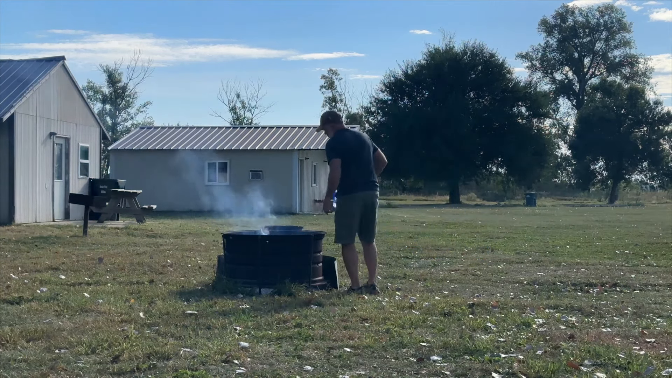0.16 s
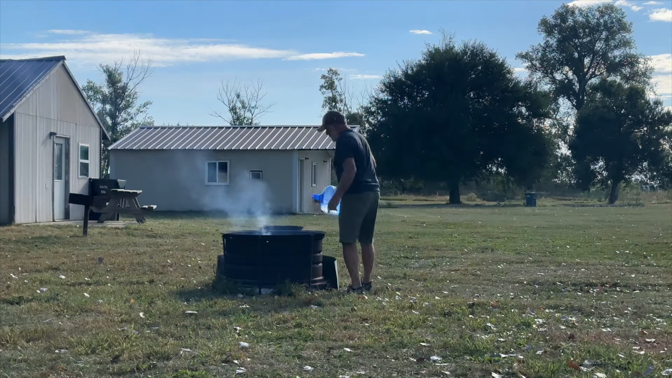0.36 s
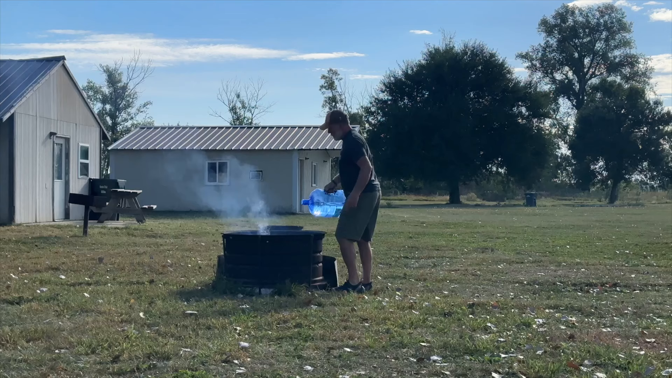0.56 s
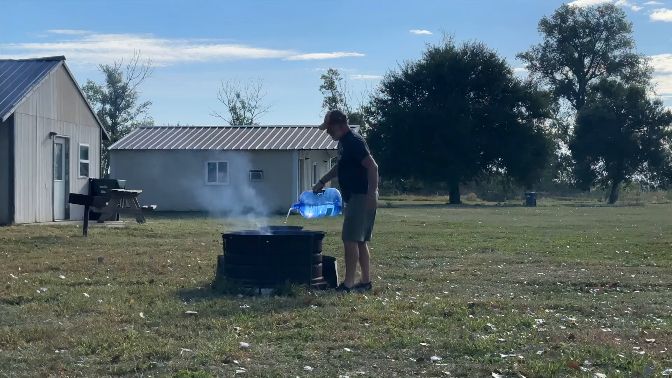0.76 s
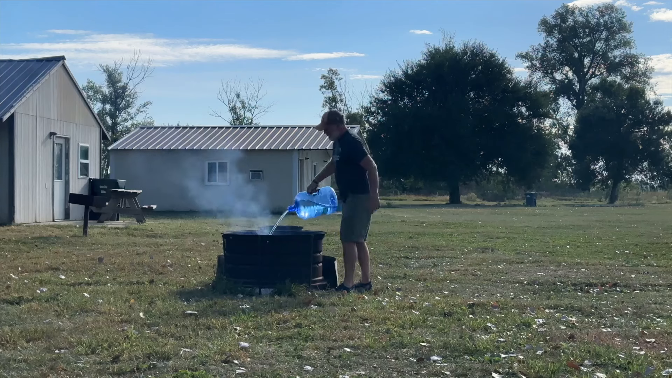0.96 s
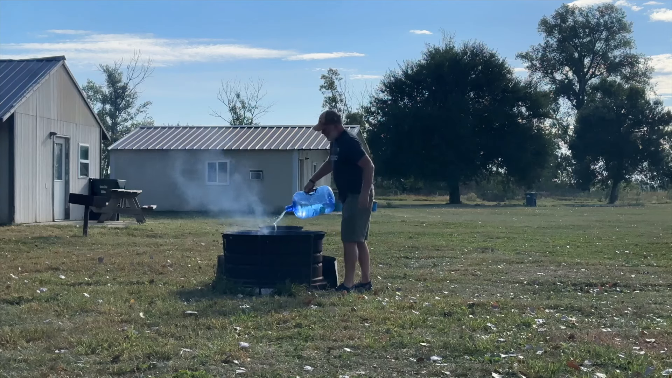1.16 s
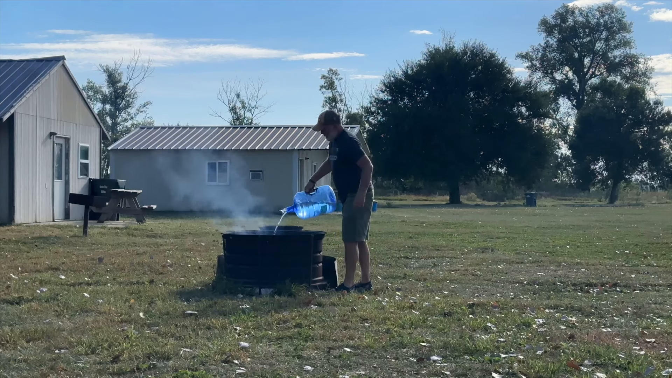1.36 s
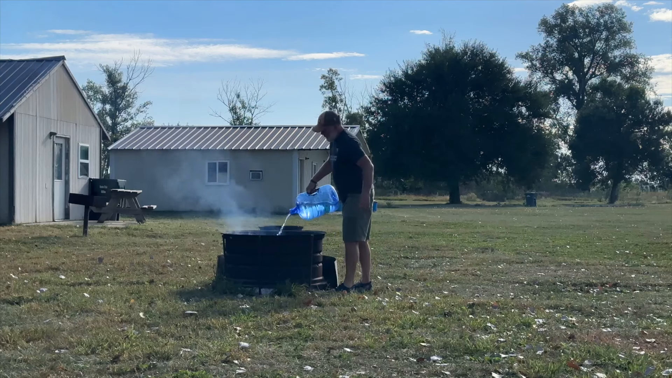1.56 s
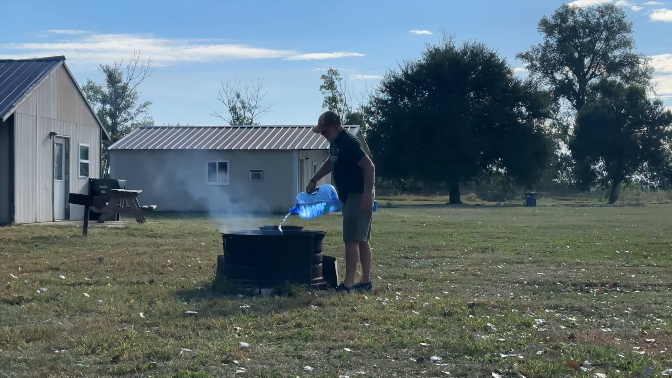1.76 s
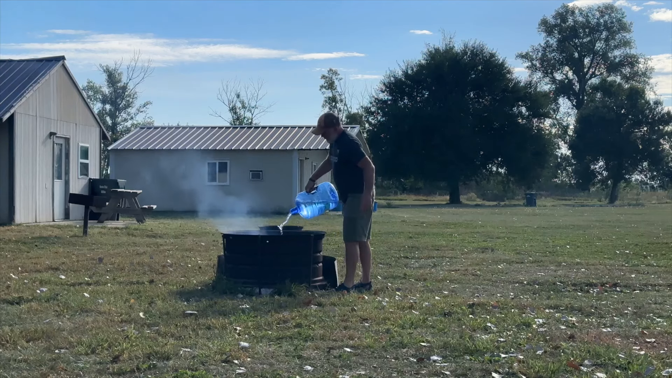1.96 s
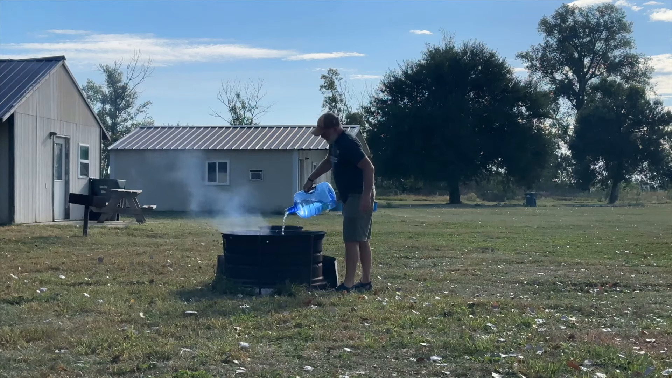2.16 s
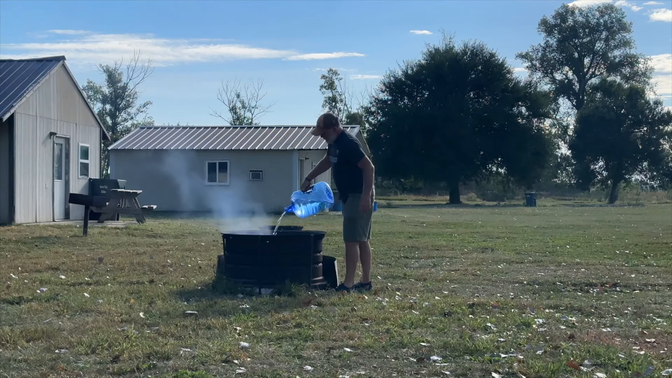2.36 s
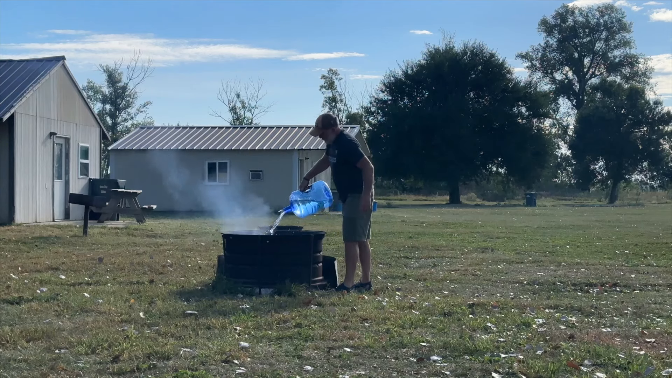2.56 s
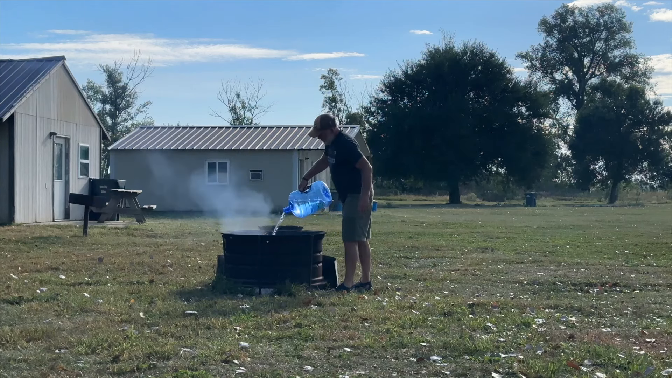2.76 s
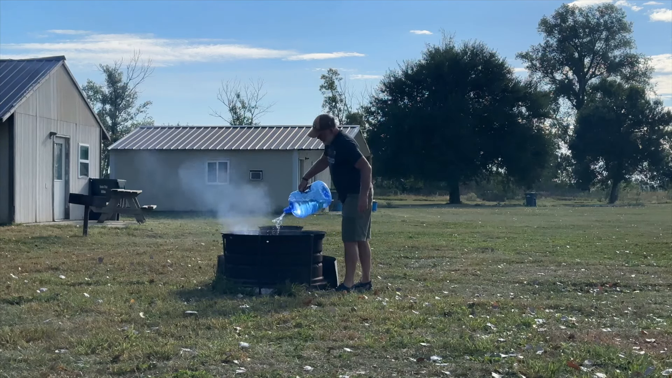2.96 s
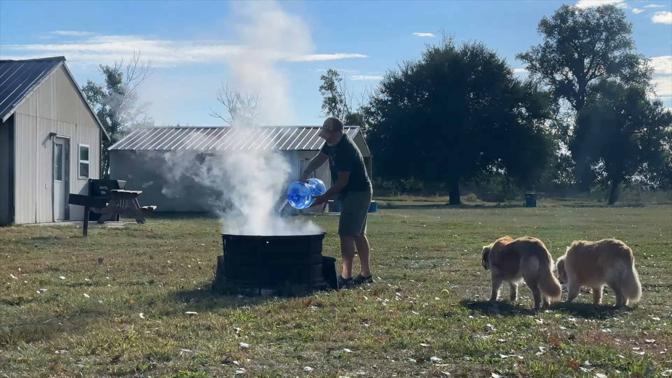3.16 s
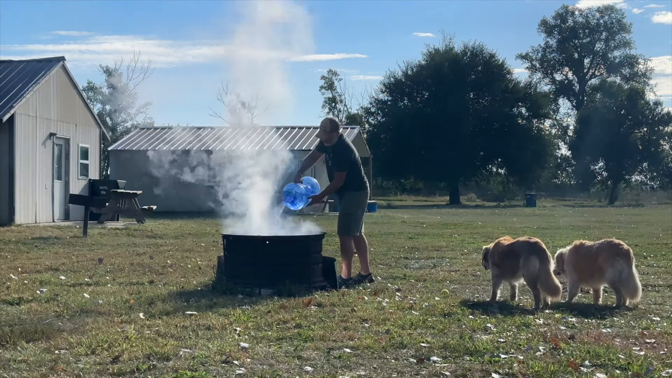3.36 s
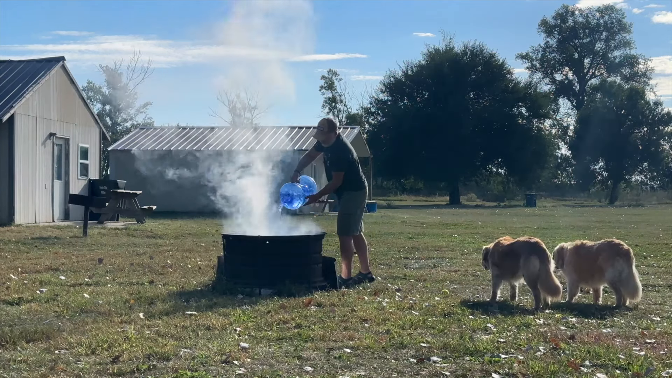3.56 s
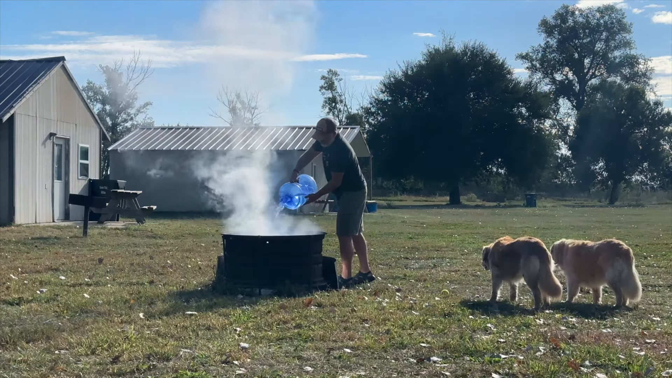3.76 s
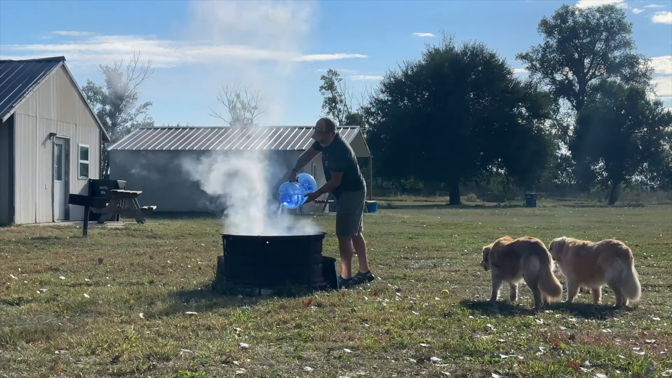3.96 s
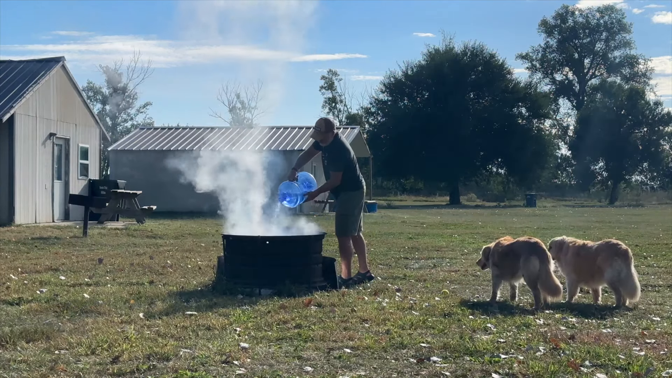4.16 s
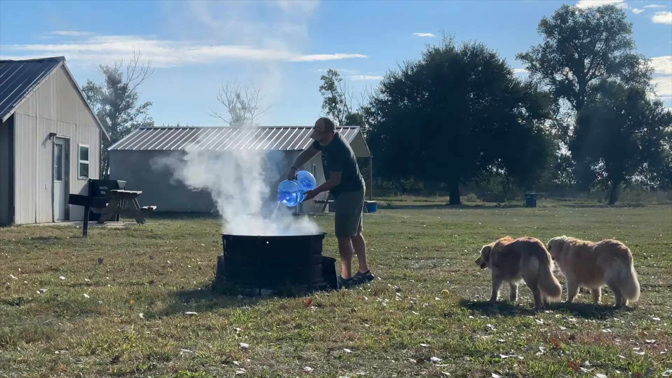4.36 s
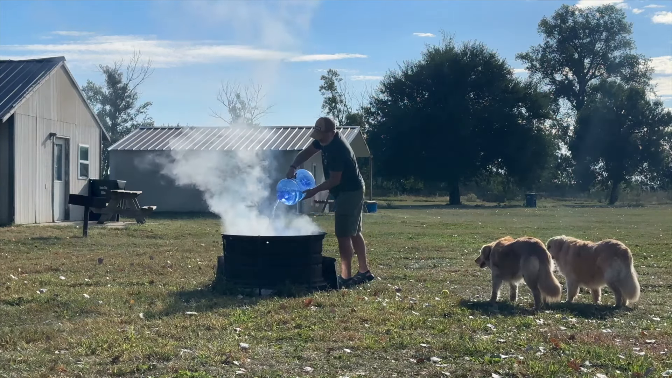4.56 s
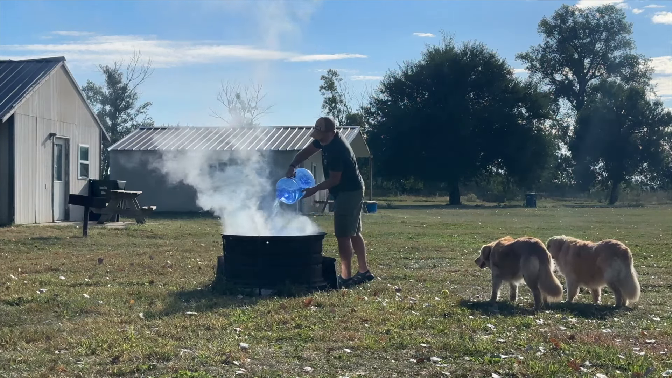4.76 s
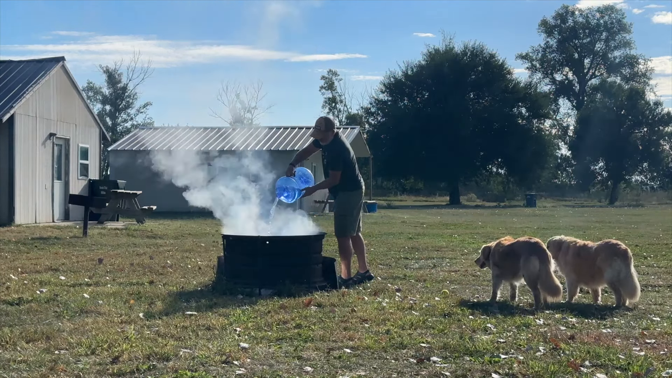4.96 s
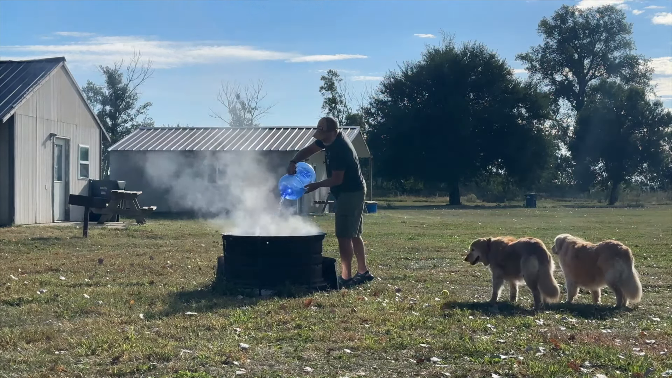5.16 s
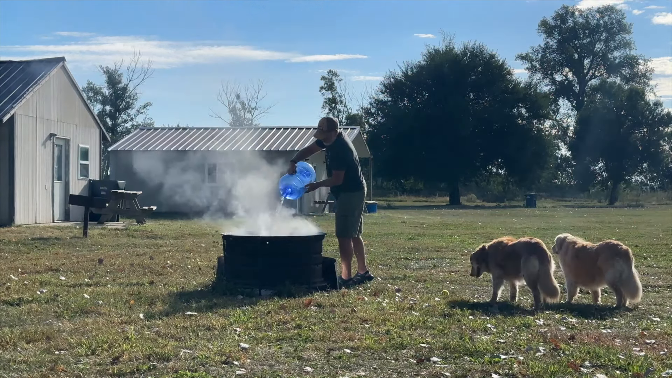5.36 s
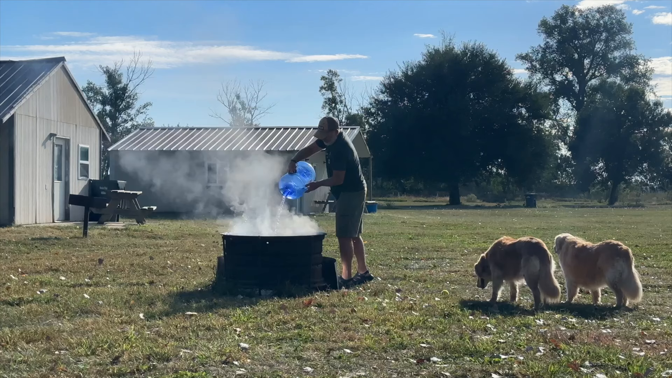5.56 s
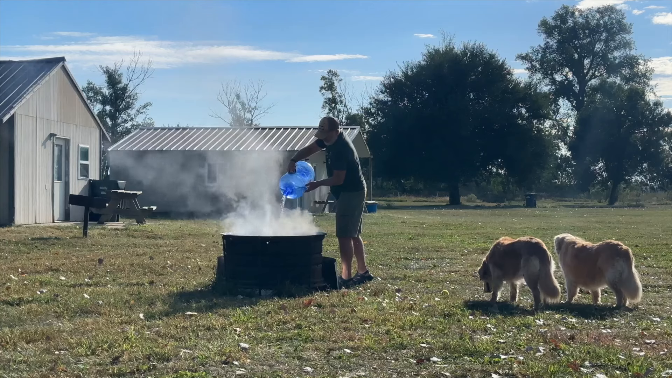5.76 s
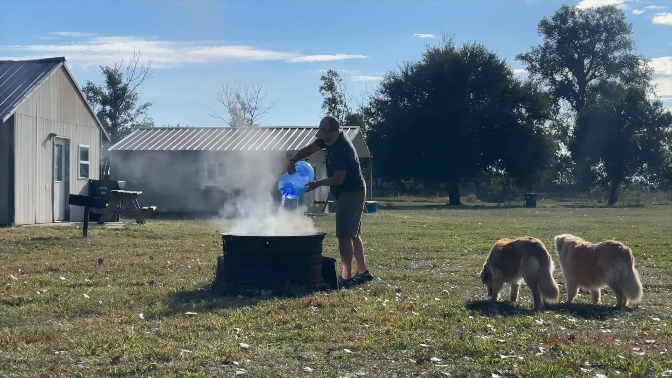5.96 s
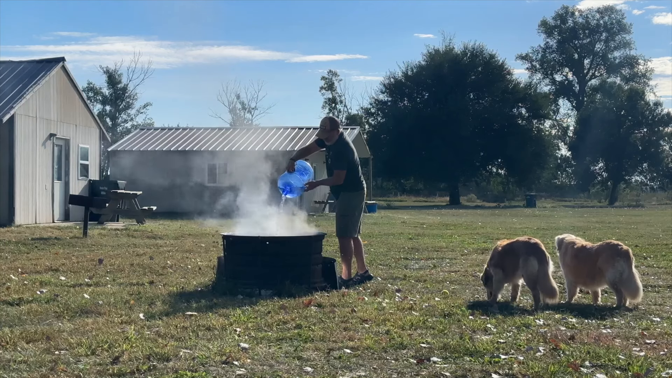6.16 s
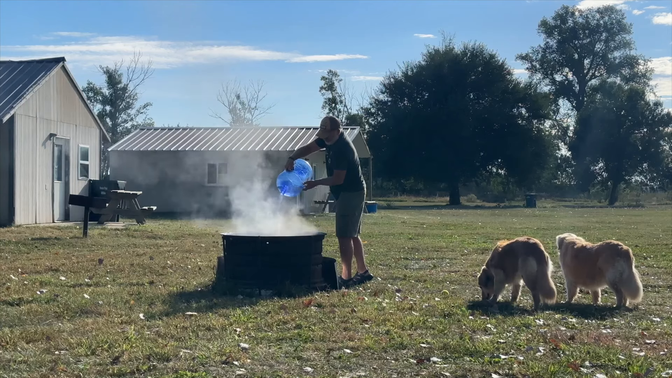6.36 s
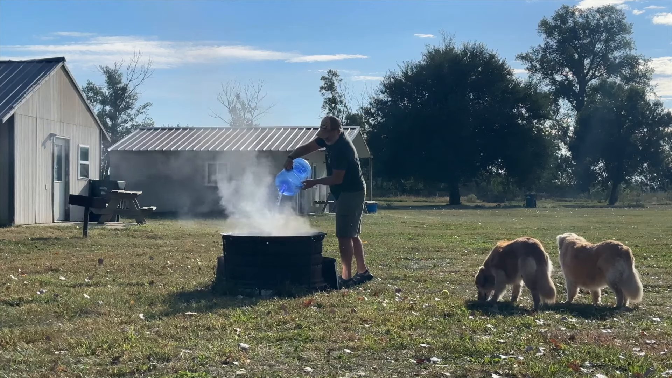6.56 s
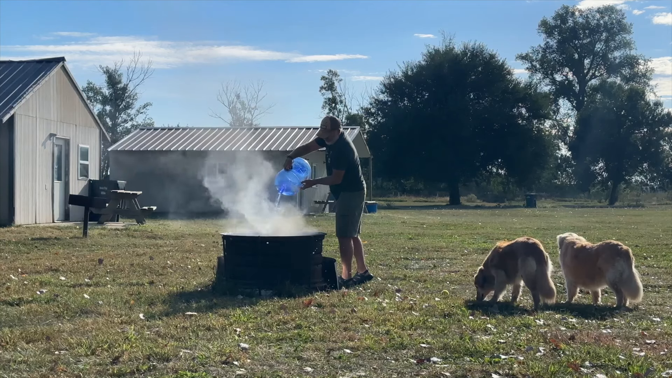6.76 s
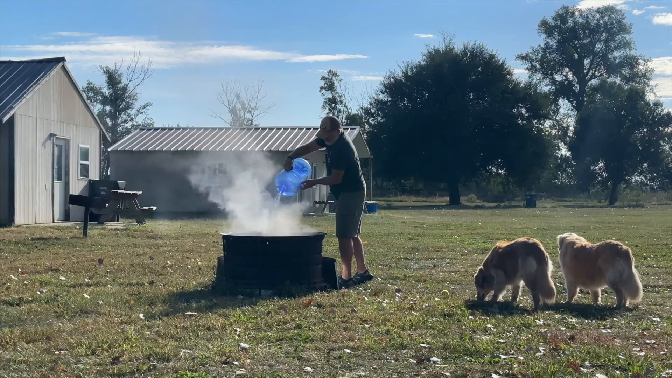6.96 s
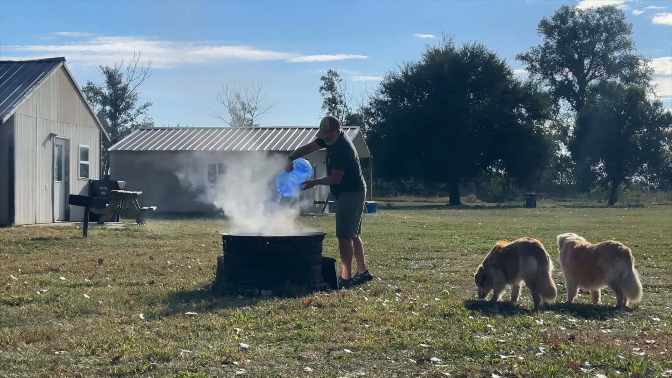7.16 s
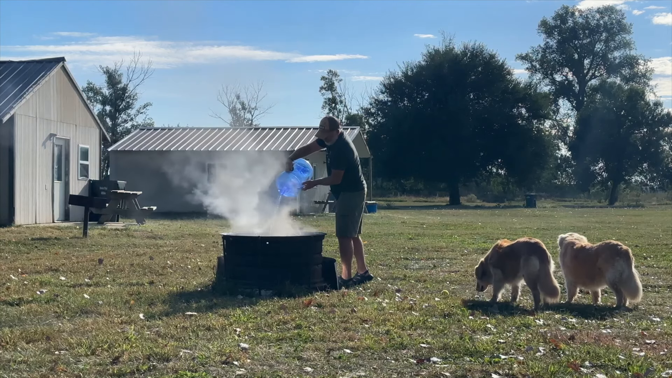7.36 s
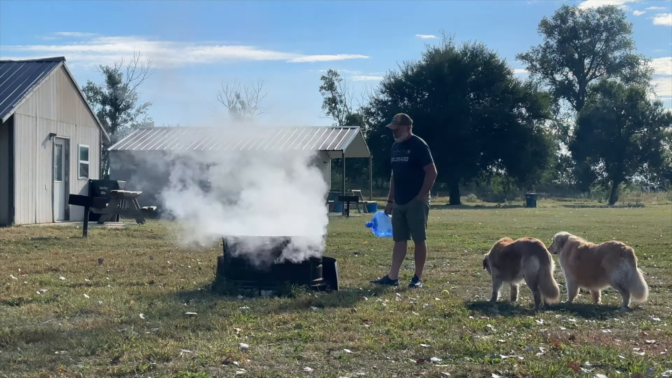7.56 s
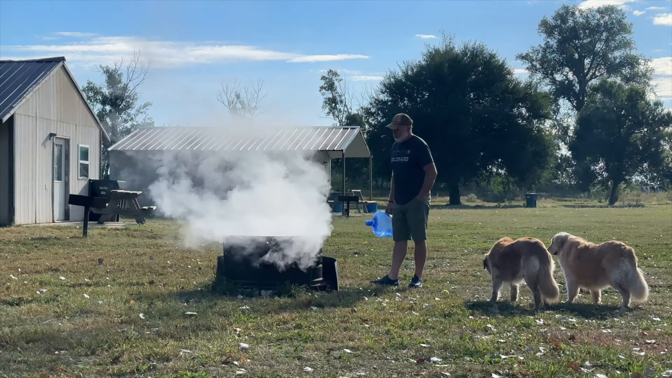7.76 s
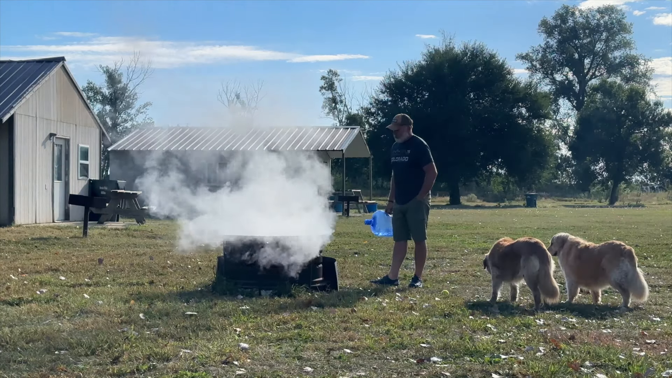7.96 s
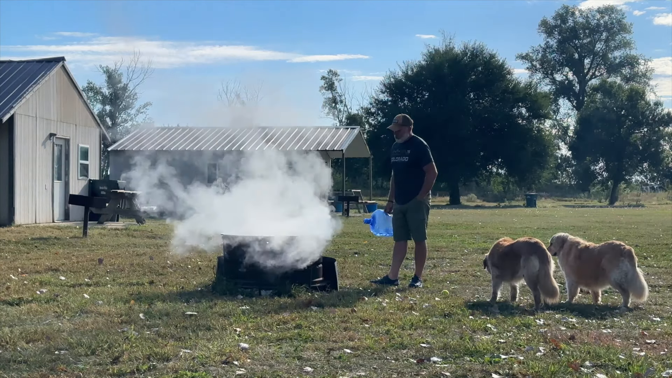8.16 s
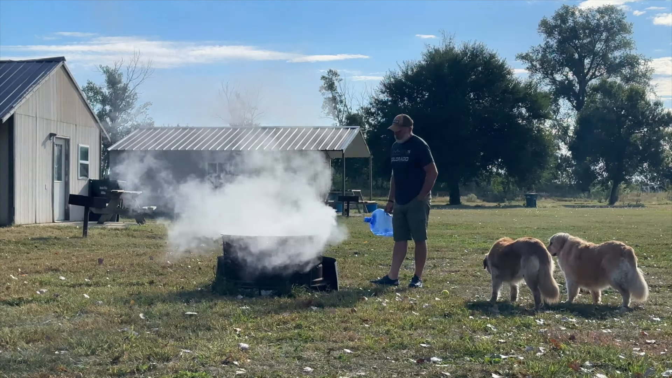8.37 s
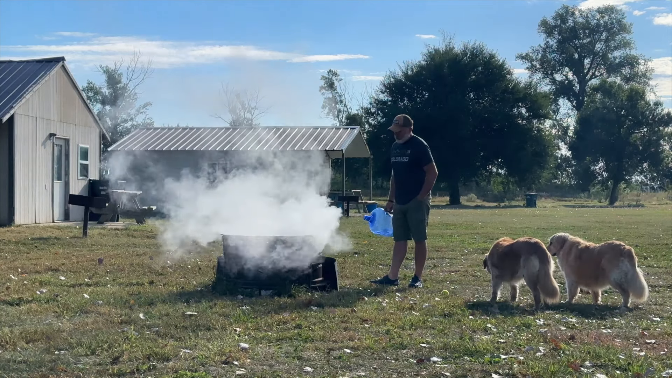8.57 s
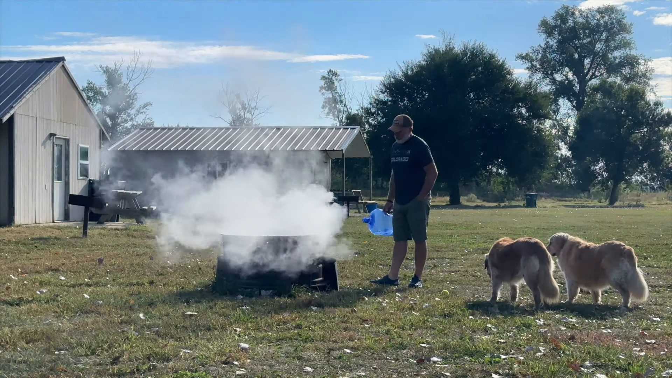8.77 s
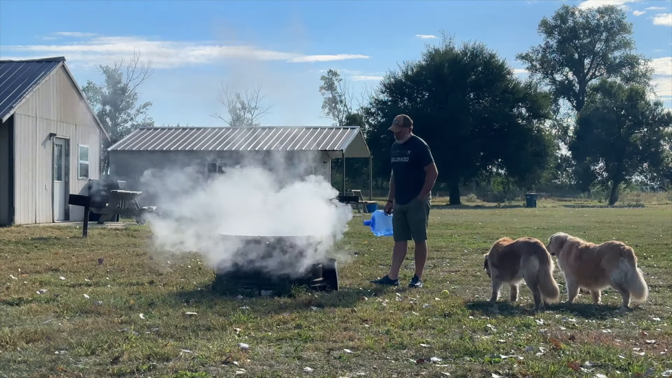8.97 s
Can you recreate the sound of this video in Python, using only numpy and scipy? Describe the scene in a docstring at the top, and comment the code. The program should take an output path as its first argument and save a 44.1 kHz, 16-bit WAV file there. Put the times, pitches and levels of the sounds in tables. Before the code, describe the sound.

Water glugs from a plastic jug onto hot coals in a steel fire ring, sizzling, plopping and cracking, with crickets and low wind rumble.

```python
"""Water is poured from a plastic jug onto hot coals in a steel fire ring, some metres off on a lawn.
Slaps, plops and gurgles are noise bursts and ringing bubbles; the stream is a mass of tiny bubbles.
The coals sizzle (crackle in hiss), spit, crack and whoomph; steam is a soft low roar of noise.
Crickets (falling tones, merged trills) and katydids (pulsed high rasps) sing in the grass.
Wind, as low noise, rumbles on the microphone."""
import sys
import numpy as np
from scipy import signal
from scipy.fft import rfft, irfft, next_fast_len
from scipy.io import wavfile

SR = 44100
rng = np.random.default_rng(int(sys.argv[2]) if len(sys.argv) > 2 else 0)


def unload_audio(sound):
    """Save the sound as a 16-bit wav file, at the path given as the first command line argument."""
    columns = np.transpose(np.atleast_2d(sound))
    # keep every value between -1 and 1, then stretch to whole-number steps
    steps = np.round(np.clip(columns, -1, 1) * 32767)
    wavfile.write(sys.argv[1], SR, steps.astype(np.int16))


N = 397782

# All levels are relative: they precede the mix gains in scene().
# breeze: (time [s], rumble level [dB], buffeting level [dB])
WIND = [(0, -35, -40), (0.9, -39, -43), (1.5, -37.5, -41.5), (2.2, -38, -43), (3.2, -39.5, -45.5),
        (3.7, -38, -46.5), (4.75, -38, -42), (5.0, -36, -41), (5.3, -37.5, -43), (7.3, -38, -43),
        (8.6, -41, -47), (9.02, -43, -49.5)]
# low whoomphs near 100 Hz, mostly as water surges onto the coals: (time [s], length [s], level [dB])
WHOOMPHS = [(1.3, 0.12, -39), (1.6, 0.05, -34.5), (4.03, 0.084, -37.5), (4.255, 0.042, -29),
            (4.66, 0.083, -35), (7.44, 0.046, -43)]
# field cricket chirps of three wing strokes: (time [s], level [dB], starting pitch [Hz], first gap [s],
# second gap [s], stroke length [s], swell per stroke [dB], pitch step per stroke [Hz])
CHIRPS = [(0.1, -49, 4330, 0.055, 0.07, 0.031, 1, 2), (0.675, -49, 4340, 0.052, 0.069, 0.031, 2, 0),
          (1.253, -45, 4340, 0.048, 0.066, 0.035, 1, 0), (3.069, -48, 4280, 0.059, 0.067, 0.031, 1.5, -2),
          (3.681, -46, 4330, 0.059, 0.07, 0.023, 0.5, -3),
          (7.702, -45.5, 4330, 0.058, 0.063, 0.032, 0.5, 6), (7.742, -50, 4970, 0.025, 0.03, 0.02, 0, 0),
          (8.123, -47, 4420, 0.073, 0.13, 0.017, -1, -3),
          (8.253, -48.5, 5000, 0.074, 0.09, 0.022, 4.5, -230),
          (8.294, -40, 4430, 0.07, 0.079, 0.027, 3.5, 111), (8.67, -48, 5100, 0.06, 0.07, 0.02, -1.5, 150),
          (8.943, -42, 4720, 0.036, 0.06, 0.024, -1, 2)]
# katydid songs: (time [s], length [s], level [dB])
SLOW_SONGS = [(0.3, 1, -59), (3.0, 1.2, -58), (4.9, 1.3, -57.5)]
FAST_SONGS = [(1.5, 1.53, -53), (3.9, 1.1, -56.5), (6.3, 2.7, -54)]
# steam over wet coals: (time [s], roar level [dB])
STEAM = [(0, -61), (0.8, -56), (1.3, -55.5), (2.0, -49.5), (2.95, -50.5), (3.15, -56), (4.85, -59.5),
         (5.15, -50), (6.1, -48), (7.45, -46), (7.8, -54.5), (9.02, -55)]
# short steam puffs around the gulps: (time [s], length [s], roar level [dB])
PUFFS = [(1.33, 0.15, -49.5), (1.59, 0.06, -46.5), (1.89, 0.11, -51), (2.1, 0.08, -49.5), (2.35, 0.17, -48),
         (4.66, 0.11, -49), (6.04, 0.047, -43)]
# quenched coals crack: (time [s], level [dB], pitch [Hz])
CRACKS = [(1.8763, -23.5, 3770), (2.029, -27, 3730), (2.4003, -25.5, 3800), (2.5225, -28, 3860),
          (2.7087, -25, 8000), (3.233, -35.5, 3750), (3.445, -27, 6600), (3.6966, -22, 7270),
          (4.072, -25, 4700), (4.543, -25, 4700), (4.5697, -19.5, 3670), (4.624, -28, 3650),
          (4.6587, -20.5, 7200), (5.0258, -10.5, 7010), (5.0255, -26, 3660), (5.2875, -28, 7000),
          (6.087, -21.5, 8500)]
# spits, water slapping onto coals and flashing off: (time [s], level [dB], pitch [Hz], decay [s])
SPITS = [(0.089, -40, 2100, 0.0038), (0.499, -38, 3560, 0.015), (0.976, -43, 990, 0.012),
         (1.321, -35.5, 2900, 0.015), (1.875, -42, 940, 0.02), (2.109, -38, 2500, 0.004),
         (2.399, -28.5, 1900, 0.0038), (2.841, -32.5, 2420, 0.009), (2.979, -35, 2280, 0.0039),
         (3.231, -42, 3000, 0.0033), (3.697, -33, 1900, 0.0074), (4.072, -33, 1600, 0.0046),
         (4.255, -27.5, 2400, 0.0036), (4.628, -29.5, 1800, 0.0053), (4.658, -29, 5500, 0.0046),
         (4.686, -40, 1200, 0.022), (5.016, -31.5, 2260, 0.016), (6.255, -42, 1310, 0.034),
         (6.479, -33.5, 3020, 0.019), (7.456, -32, 3160, 0.013)]
# the stream, poured in several stretches with pauses: (time [s], sizzle level [dB], splashing level [dB])
POUR = [(0, -53, -60), (0.47, -74.5, -57), (0.52, -54.5, -50.5), (0.9, -69, -59), (1.08, -52.5, -49.5),
        (2.3, -51.5, -47.5), (3.01, -52, -47), (3.06, -69, -59), (3.35, -66, -63), (3.4, -52, -48.5),
        (4.0, -56, -50.5), (4.45, -49.5, -53), (4.85, -52, -48.5), (5.15, -48, -47.5), (5.8, -47, -49),
        (6.1, -49.5, -48), (7.38, -51.5, -48), (7.55, -48, -48), (7.59, -60.5, -63), (9.02, -61.5, -62)]
# surges as the jug glugs: (time [s], length [s], sizzle level [dB], splashing level [dB])
SURGES = [(1.06, 0.044, -68, -49), (2.39, 0.098, -54, -53), (2.8, 0.041, -46.5, -59),
          (2.92, 0.016, -54, -50), (3.975, 0.031, -44, -52), (4.015, 0.069, -44, -41.5),
          (4.095, 0.018, -43.5, -45), (4.32, 0.052, -47, -54), (4.68, 0.11, -49, -44.5),
          (4.91, 0.036, -44, -40.5), (5.15, 0.028, -47, -40.5), (5.18, 0.018, -48, -46),
          (5.212, 0.049, -57, -42.5), (5.395, 0.012, -49, -52), (5.472, 0.018, -58, -37),
          (5.545, 0.016, -61, -44), (5.615, 0.029, -50, -48), (5.69, 0.067, -47, -44),
          (6.055, 0.047, -49.5, -37), (6.155, 0.022, -49, -37), (6.28, 0.13, -62, -43),
          (6.8, 0.49, -57, -47)]
# gurgles in a deepening water-filled hollow: (time [s], level [dB], starting pitch [Hz], length [s])
GURGLES = [(0.522, -46, 1750, 0.12), (0.622, -42, 980, 0.09), (1.045, -45, 746, 0.028),
           (1.31, -43, 603, 0.05), (1.885, -38, 473, 0.06), (1.985, -37.5, 966, 0.04),
           (2.718, -38, 780, 0.04), (2.972, -41, 600, 0.038), (3.545, -43, 810, 0.016),
           (3.59, -38, 1340, 0.028), (3.735, -36.5, 1115, 0.053), (3.88, -39.5, 865, 0.017),
           (4.061, -45, 730, 0.056), (4.525, -44, 990, 0.04), (4.645, -37.5, 1490, 0.029),
           (4.596, -37.5, 1160, 0.032), (4.681, -28.5, 1600, 0.025), (4.696, -37, 975, 0.035),
           (4.71, -44, 1460, 0.06), (5.576, -41, 910, 0.022), (5.7, -36.5, 1300, 0.04),
           (6.051, -37, 2160, 0.068), (6.261, -31, 1760, 0.08), (6.985, -35, 843, 0.064)]
# gulps of water landing: (time [s], level [dB], bubble pitch [Hz], droplets re bubble [dB])
PLOPS = [(0.985, -34, 2470, -11), (0.999, -36, 1190, -18), (1.301, -21, 1160, -12), (1.319, -29, 1286, -2),
         (1.36, -28.5, 1230, -15), (1.5935, -24.5, 1900, -14), (1.597, -27, 1256, -18),
         (1.878, -22, 3420, -6), (1.902, -25, 2420, -6), (2.0285, -23, 2490, -20),
         (2.032, -18.5, 2350, -20), (2.0965, -23, 1250, -13), (2.107, -31, 1300, -9),
         (2.367, -30, 1300, -6), (2.387, -24, 1260, -9), (2.4, -24.5, 2030, -6), (2.413, -22, 1670, -16),
         (2.515, -22, 1290, -11), (2.588, -36.5, 1410, 2), (2.832, -22, 1070, -14),
         (2.846, -28.5, 1220, -14), (3.232, -30, 1780, -13), (3.444, -26.5, 1280, -13),
         (3.9915, -17, 1920, -18), (4.022, -35, 1610, -10), (4.04, -29, 835, -22), (4.06, -27, 1890, -15),
         (4.151, -23, 2970, -9), (4.227, -33.5, 1390, -19), (4.265, -29.5, 1075, -17),
         (4.294, -29, 2300, -16), (4.514, -26, 2130, -9), (4.524, -24.5, 1760, -8), (4.568, -27, 1410, -26),
         (4.577, -23, 1620, -18), (4.589, -21, 1850, -21), (4.62, -27, 1980, -18), (4.629, -27, 1620, -6),
         (5.072, -35.5, 1350, -12), (5.217, -28, 2230, 5), (5.37, -29.5, 1430, -19),
         (5.406, -28, 1380, -15), (5.489, -26, 2420, -8), (5.652, -24, 2530, -10), (6.065, -33, 1534, -6),
         (6.16, -33, 2040, -2), (6.364, -28, 1740, -11)]
# heavy gulps thudding into the ash bed: (time [s], level [dB], starting pitch [Hz])
THUDS = [(1.302, -19.5, 560), (1.876, -24, 526), (1.8757, -21, 980), (2.097, -30.5, 704), (2.979, -38, 487),
         (4.629, -24, 800), (4.636, -35, 476), (4.696, -28.5, 590), (5.012, -36, 670)]

# filter curves of the sources: (frequency [Hz], gain [dB])
RUMBLE_CURVE = [(12, -40), (25, -17), (42, -7.5), (54, 5), (62, 9), (72, 4), (85, 5), (105, -16),
                (200, -78.5)]
LOW_THUMP_CURVE = [(60, -38), (90, -4), (108, 3), (140, -7.5), (180, -13.5), (350, -90)]  # wind buffeting and whoomphs
LAWN_CURVE = [(100, 13), (500, 4.5), (800, 1.5), (1300, -11.5), (1600, -7), (1850, 7), (2200, -32),
              (2700, 3), (3500, -1), (5500, -0.5), (9500, -24), (12500, -10), (16000, -25)]
CHORUS_CURVE = [(3500, -36.5), (4000, -4), (4300, 0.5), (4700, -6), (5400, -32), (6200, -2.5), (6600, 0),
                (7000, 7), (7500, 4), (8050, 0), (8600, -21.5), (10500, -29)]
KATYDID_CURVE = [(10000, -32.5), (12000, -16), (13000, -9.5), (13600, -7.5), (14400, -12.5), (15000, -3),
                 (15600, -2.5), (17000, 0)]
ROAR_CURVE = [(100, -11), (165, 0), (210, -3), (265, -5), (320, -12), (480, -19), (900, -52), (2000, -60)]
SIZZLE_CURVE = [(1500, -10), (2600, -0.5), (3400, -2), (5000, 1), (6500, 3), (8200, 1.5), (9600, -2),
                (10700, -22), (12500, -16), (16000, -8.5)]
SPLASH_CURVE = [(600, -9.5), (1000, -7), (1300, -4.5), (1600, -1), (1900, 2), (2500, 0.5), (3100, -3.5),
                (4500, 0.5), (7000, -44.5)]
CHURN_CURVE = [(300, 18), (480, 0.5), (800, 12), (1000, -10), (1400, 25), (3000, -47)]
# stereo width, gain of the side signal: (frequency [Hz], gain [dB])
WIDTH_CURVE = [(30, -25), (60, -23.5), (125, -15.5), (250, -11.5), (1000, -11), (1650, -6), (2200, -19),
               (2900, -10), (3600, -13), (4300, -28), (5700, -28), (7700, -11), (8600, -14), (9800, -7),
               (10500, -34), (12100, -34), (12700, -7), (14200, -20), (15800, -8)]
# phase between the microphone channels: (frequency [Hz], lead of left over right [rad])
PORT_PHASE = [(2400, 0), (3300, .45), (3900, 0), (6600, 0), (7000, 1.0), (7480, 3.14), (8000, 5.8),
              (8400, 6.28), (9100, 5.9), (9700, 4.9), (10300, 3.14), (12250, 3.14), (12700, 1.6),
              (13900, 0), (14800, 0), (15700, -.9)]

CUTOFF_HZ = 15700
BURST_ATTACK_S, BURST_RELEASE_S = 0.0074, 0.012  # whoomphs and steam puffs
SURGE_ATTACK_S, SURGE_RELEASE_S = 0.012, 0.016
SLOW_BEATS_PER_S, FAST_BEATS_PER_S = 12.76, 25.0
SONG_ATTACK_S, SONG_RELEASE_S, FAR_KATYDID_DB = 0.092, 0.08, -65.5
FAR_SPACING_S = 0.057  # stroke spacing of far crickets
# random lesser events: levels over the sizzle (cracks) or splashing (others), typical pitches
STRAY_CRACK_DB, STRAY_CRACK_HZ = 11, 6140
STRAY_PLOP_DB, STRAY_PLOP_HZ, STRAY_TRAIL_DB = 5.5, 1900, -16
TRICKLE_DB, TRICKLE_HZ = 6.5, 2200


def from_db(db):
    """Decibels to gain."""
    return 10 ** (np.asarray(db) / 20)


def rms_one(x):
    """Scale to unit power."""
    return x / np.sqrt(np.mean(x ** 2) + 1e-20)


def gains(rows):
    """Each dB column of a curve as a gain per sample."""
    times_s, *columns = np.transpose(rows)
    t = np.arange(N) / SR
    return [from_db(np.interp(t, times_s, db)) for db in columns]


def swells(rows, attack_s, release_s):
    """Rows (time, length, dB, ..) rise, hold and die away; powers add; one gain curve per dB column."""
    t, power = np.arange(0, N, 40) / SR, 0
    for start_s, length_s, *db in rows:
        rise = np.clip((t - start_s) / attack_s, 0, 1)
        fall = np.exp(-np.maximum(t - start_s - length_s, 0) / release_s)
        power = power + np.outer(from_db(db), rise * fall) ** 2
    return [np.interp(np.arange(N) / SR, t, np.sqrt(p)) for p in power]


def drift(knots_per_s):
    """Random curve: normal knots of spread 1, joined by straight lines."""
    knots = rng.standard_normal(N // 40)
    return np.interp(np.arange(N) / SR * knots_per_s, np.arange(len(knots)), knots)


def colour(x, curve):
    """Filter by a gain curve drawn on a log-frequency axis."""
    size = next_fast_len(N + SR // 10)
    hz, db = np.transpose(curve)
    bins_hz = np.maximum(np.fft.rfftfreq(size, 1 / SR), 1)
    gain = from_db(np.interp(np.log(bins_hz), np.log(hz), db))
    return irfft(rfft(x, size) * gain, size)[..., :N]


def spread(mid, side):
    """Stereo from two unrelated draws of one sound, with frequency-dependent width and unit mid power."""
    side = colour(side, WIDTH_CURVE)
    return np.array([mid + side, mid - side]) / np.std(mid)


def noise(curve):
    """Coloured stereo noise with unit mid power."""
    return spread(*colour(rng.standard_normal((2, N)), curve))


def add(track, start_s, sound):
    """Mix a short sound into a track."""
    i = int(np.clip(start_s * SR, 0, N - 1))
    track[i:i + len(sound)] += sound[:N - i]


def strays(level, over_db, hz, count, spread_db=4.0, scatter=0.2):
    """Random small events that follow a driving level: rows (time [s], level [dB], pitch [Hz])."""
    at = rng.integers(0, N, count)
    size, pitch = rng.standard_normal((count, 2)).T
    db = 20 * np.log10(level[at]) + over_db + spread_db * size
    return list(zip(at / SR, db, hz * np.exp(scatter * pitch)))


def bubble(hz, cycles, rise, onset_cycles=0.23):
    """A ringing air pocket climbs in pitch as it nears the surface and decays 60 dB over its cycles."""
    cycles = max(cycles, 2)
    t = np.arange(int(cycles / hz * SR)) / SR
    age = t * hz / cycles
    swell = np.minimum(t * hz / onset_cycles, 1)
    return swell * from_db(-60 * age) * np.sin(2 * np.pi * hz * t * (1 + rise * age))


def grains(per_s, low_hz, high_hz, cycles, spread_db, clump_db, count=24):
    """Clumped random clicks ring a bank of resonators spread in pitch; two unrelated draws."""
    clumps = np.tile(from_db(clump_db * drift(45)), 2)
    at = np.flatnonzero(rng.random(2 * N) < per_s * clumps / SR)
    loudness = from_db(spread_db * np.minimum(rng.exponential(1, 2 * N), 4))
    sizes = (loudness * rng.choice([-1, 1], 2 * N))[at]
    dealt = rng.integers(0, count, 2 * N)[at]
    out = np.zeros(2 * N)
    for k, hz in enumerate(np.geomspace(low_hz, high_hz, count)):
        clicks = np.full(2 * N, 1e-18)  # tiny offset avoids denormals
        clicks[at[dealt == k]] = sizes[dealt == k]
        r = np.exp(-np.log(1000) * hz / (cycles * SR))  # -60 dB after the given cycles
        w = 2 * np.pi * hz / SR
        out += signal.lfilter([0, np.sin(w) * np.sqrt(hz)], [1, -2 * r * np.cos(w), r * r], clicks)
    return rms_one(out).reshape(2, N)


def outdoors(x, scatter_s=0.01, echo_db=-12.5):
    """The steel ring and the ground scatter short sounds, differently to the two sides."""
    t = np.arange(SR // 20) / SR
    paths = rng.standard_normal((2, len(t))) * np.exp(-t / scatter_s)
    echo, side = [signal.fftconvolve(x, p / np.linalg.norm(p))[:N] for p in paths]
    return x + from_db(echo_db) * echo + colour(side, WIDTH_CURVE) * [[1], [-1]]


def lawn():
    """Steady broadband background of the lawn, as filtered noise."""
    return noise(LAWN_CURVE)


def breeze(lumpy_db=1.5, lumps_per_s=6.3):
    """Wind rumbles on the microphone and buffets it unevenly, both as low noise."""
    rumble, buffet = gains(WIND)
    buffet = buffet * from_db(lumpy_db * drift(lumps_per_s))
    return rumble * noise(RUMBLE_CURVE) + buffet * noise(LOW_THUMP_CURVE)


def ground_crickets(trill_db=-7.5):
    """Countless high trills, long-ringing grains over noise, merge into a shimmering band."""
    trills = spread(*grains(570, 6410, 7140, cycles=420.0, spread_db=10.5, clump_db=-3.5, count=8))
    return noise(CHORUS_CURVE) + from_db(trill_db) * trills


def katydid(songs, beats_per_s, first_s, stroke_s, rest_db):
    """A very high rasp leaps up and fades at each wing closing; far ones go on between the songs."""
    t = np.arange(N) / SR
    jitter_s = 0.0015 * drift(5.5)
    age = ((t - first_s + jitter_s) % (1 / beats_per_s)) / stroke_s
    beat = age * np.exp(1 - age) + from_db(rest_db)
    level = np.hypot(swells(songs, SONG_ATTACK_S, SONG_RELEASE_S)[0], from_db(FAR_KATYDID_DB))
    return level * rms_one(noise(KATYDID_CURVE) * beat * from_db(2.4 * drift(19)))


def field_crickets(fall=0.12, bend=1.4, attack_share=0.18,
                   far_db=-56.5, far_hz=4400, far_stroke_s=0.024, count=60):
    """Each stroke is a clean tone that falls as the wing slows; far crickets join in at random."""
    out = np.zeros(N)
    far = []
    for when, size, pitch in rng.random((count, 3)):
        db, hz = far_db + 4 * (size - .5), far_hz * (1 + .16 * (pitch - .5))
        far.append((when * N / SR, db, hz, FAR_SPACING_S, FAR_SPACING_S, far_stroke_s, 0, 0))
    for start_s, db, hz, gap1_s, gap2_s, length_s, swell_db, step_hz in list(CHIRPS) + far:
        age = np.linspace(0, 1, int(length_s * SR))
        shape = np.minimum(age / attack_share, 1) * np.cos(np.pi / 2 * age)
        for k, stroke_s in enumerate(np.cumsum([start_s, gap1_s, gap2_s])):
            pitch_hz = (hz + k * step_hz) * (1 - fall * age ** bend)
            tone = np.sin(2 * np.pi * np.cumsum(pitch_hz) / SR)
            add(out, stroke_s, from_db(db + k * swell_db) * shape * tone)
    return out


def rising_steam(billow_db=3.0, billows_per_s=20.0):
    """Steam is a soft low roar of noise in uneven billows and puffs."""
    level = np.hypot(gains(STEAM)[0], swells(PUFFS, BURST_ATTACK_S, BURST_RELEASE_S)[0])
    return level * from_db(billow_db * drift(billows_per_s)) * noise(ROAR_CURVE)


def whoomphs():
    """Low whoomphs: short swells of noise near 100 Hz."""
    return swells(WHOOMPHS, BURST_ATTACK_S, BURST_RELEASE_S)[0] * noise(LOW_THUMP_CURVE)


def sizzle(grain_db=-6.5, jet_db=-2.0, flutter_db=2.5):
    """Droplets flash to steam on the coals: fine crackle in a fluttering hiss."""
    crackle = grains(2500, 2750, 9200, cycles=8.4, spread_db=3.5, clump_db=2.0, count=12)
    hiss = from_db(grain_db) * crackle + from_db(jet_db) * rng.standard_normal((2, N))
    return spread(*colour(hiss, SIZZLE_CURVE)) * from_db(flutter_db * drift(50))


def cracks(boil, snap_s=0.0017, crumble_s=0.015, width=1.164):
    """A coal splits with a sharp band-passed snap, followed by a brief crumbling."""
    out, t = np.zeros(N), np.arange(SR // 20) / SR
    shape = np.exp(-t / snap_s) + from_db(-15) * np.exp(-t / crumble_s)
    for start_s, db, hz in list(CRACKS) + strays(boil, STRAY_CRACK_DB, STRAY_CRACK_HZ, count=16):
        band = signal.butter(2, [hz / width, min(hz * width, SR / 3)], "band", fs=SR, output="sos")
        snap = signal.sosfilt(band, shape * rng.choice([-1, 1], len(t)))
        add(out, start_s, from_db(db) * snap / np.abs(snap).max())
    return out


def spits(width=1.9, attack_share=0.29):
    """Short bursts of hiss flare up and die as the water film boils off."""
    out, t = np.zeros(N), np.arange(SR // 8) / SR
    for start_s, db, hz, decay_s in SPITS:
        band = signal.butter(2, [hz / width, min(hz * width, SR / 3)], "band", fs=SR, output="sos")
        hiss = rms_one(signal.sosfilt(band, rng.standard_normal(len(t))))
        flare = np.minimum(t / (attack_share * decay_s), 1) * np.exp(-t / decay_s)
        add(out, start_s, from_db(db) * hiss * flare)
    return out


def churning():
    """Larger pockets of air churn deep in the wet ash, as low ringing grains."""
    pockets = grains(400, 379, 1410, cycles=18.0, spread_db=5.5, clump_db=0.5, count=12)
    return spread(*colour(pockets, CHURN_CURVE))


def gurgles(fall=0.285, scatter=0.18, bubbles_per_s=190, gain_db=0.5):
    """A quick, soft chain of overlapping bubbles, on the whole growing larger and lower."""
    out = np.zeros(N)
    for start_s, db, hz, length_s in GURGLES:
        count = 2 + int(bubbles_per_s * length_s)
        lateness = (np.arange(count) + rng.random(count)) / count
        for late, size in zip(lateness, rng.standard_normal(count)):
            pitch_hz = hz * np.exp(scatter * size - fall * late)
            pocket = bubble(pitch_hz, cycles=22, rise=.08, onset_cycles=3)
            add(out, start_s + late * length_s, from_db(db + gain_db) * pocket)
    return out


def trickle(splash, wander=0.062, wanders_per_s=7.0, cycles=57.5, rise=0.097):
    """Single bubbles ring out; their size wanders as the stream moves over the coals."""
    out, shift = np.zeros(N), np.exp(wander * drift(wanders_per_s))
    rows = strays(splash, TRICKLE_DB, TRICKLE_HZ, count=900, spread_db=2.8, scatter=0.14)
    for start_s, db, hz in rows:
        pitch_hz = hz * shift[int(start_s * SR)]
        add(out, start_s, from_db(db) * bubble(pitch_hz, cycles, rise, onset_cycles=8.6))
    return out


def plops(splash, cycles=47.0, trail_s=0.024, scatter=0.16, rise=0.092, slap_s=0.0032, slap_db=-11.0,
          slap_attack_s=0.0012, thud_cycles=11.6, count=5):
    """Each gulp slaps down, traps a main bubble and trails droplets; heavy gulps also thud."""
    out, t = np.zeros(N), np.arange(SR // 20) / SR
    slap_shape = np.minimum(t / slap_attack_s, 1) * np.exp(-t / slap_s)
    lesser = [(*row, STRAY_TRAIL_DB) for row in strays(splash, STRAY_PLOP_DB, STRAY_PLOP_HZ, count=24)]
    for start_s, db, hz, trail_db in list(PLOPS) + lesser:
        band = signal.butter(1, [hz * 0.6, hz * 1.3], "band", fs=SR, output="sos")
        slap = signal.sosfilt(np.vstack([band, band]), rng.standard_normal(len(t)))
        add(out, start_s, from_db(db + slap_db) * rms_one(slap) * slap_shape)
        add(out, start_s + 0.00083, from_db(db) * bubble(hz, cycles, rise, onset_cycles=3.2))
        for late, size in zip(rng.random(count), rng.standard_normal(count)):
            drop = bubble(hz * np.exp(scatter * size), cycles * 0.75, rise, onset_cycles=2.4)
            add(out, start_s + 0.00299 + trail_s * late, from_db(db + trail_db - 2.4 * late) * drop)
    for start_s, db, hz in THUDS:
        add(out, start_s, from_db(db) * bubble(hz, thud_cycles, rise))
    return out


def splashing():
    """The stream breaks into many small ringing bubbles, in uneven clumps."""
    bubbles = grains(2800, 1010, 3670, cycles=23.5, spread_db=3.5, clump_db=3.0)
    return spread(*colour(bubbles, SPLASH_CURVE))


def pour(waver_db=0.47, wavers_per_s=10.0):
    """Strength of the sizzle and of the splashing: a wavering, pausing stream with surges on top."""
    stream = gains(POUR) * from_db(waver_db * drift(wavers_per_s))
    return np.hypot(stream, swells(SURGES, SURGE_ATTACK_S, SURGE_RELEASE_S))


def scene():
    """Wind, insects and fire ring together."""
    air = breeze() + from_db(-54.5) * lawn()
    slow = katydid(SLOW_SONGS, SLOW_BEATS_PER_S, first_s=0.075, stroke_s=0.0027, rest_db=-17.0)
    fast = katydid(FAST_SONGS, FAST_BEATS_PER_S, first_s=0.031, stroke_s=0.0068, rest_db=-16.5)
    crickets = from_db(-48.5) * ground_crickets() + outdoors(field_crickets(), echo_db=-15.0)
    insects = crickets + from_db(8.5) * (slow + fast)
    boil, splash = pour()
    coals = from_db(5.5) * boil * sizzle() + from_db(2.0) * rising_steam() + whoomphs()
    water = splash * (from_db(-2.5) * splashing() + from_db(-19.5) * churning())
    gulps = from_db(-2.5) * plops(splash) + trickle(splash) + gurgles()
    short_sounds = gulps + spits() + from_db(-1.0) * cracks(boil)
    return outdoors(short_sounds) + water + coals + insects + air


def record(dry):
    """The microphone pair shifts the phase between the channels; a steep low-pass cuts the top."""
    size = next_fast_len(N + SR // 10)
    phase_rad = np.interp(np.fft.rfftfreq(size, 1 / SR), *np.transpose(PORT_PHASE))
    turn = np.exp(.5j * phase_rad * [[1], [-1]])  # half to each channel
    heard = irfft(rfft(dry, size) * turn, size)[:, :N]
    low_pass = signal.ellip(12, .1, 80, CUTOFF_HZ, fs=SR, output="sos")
    return signal.sosfilt(low_pass, heard)


dry = scene()
out = record(dry)
unload_audio(out)
```